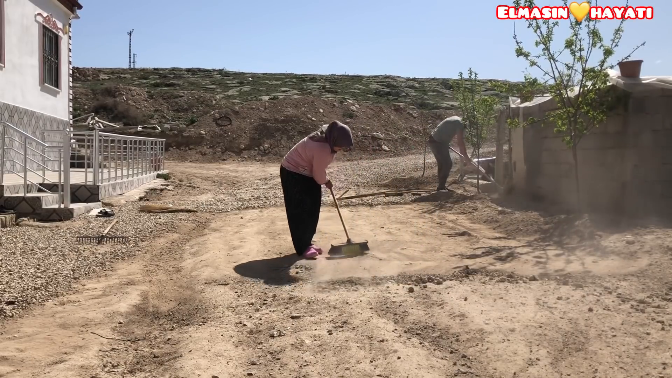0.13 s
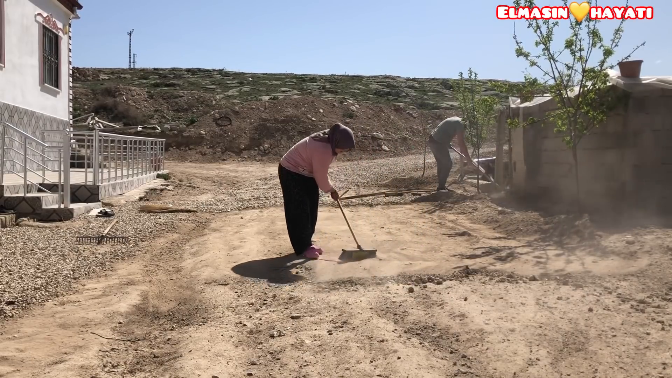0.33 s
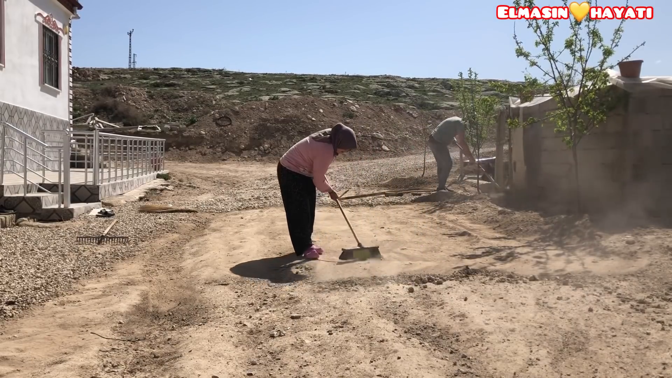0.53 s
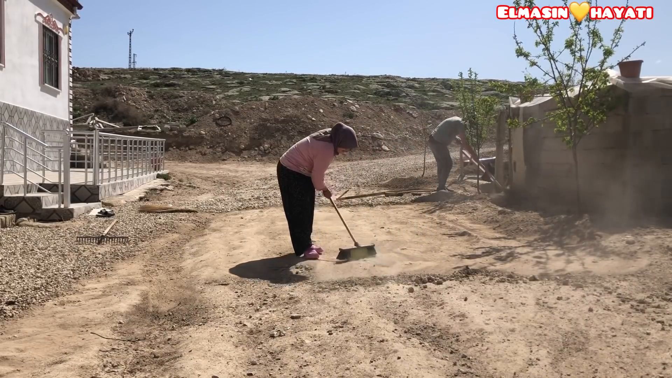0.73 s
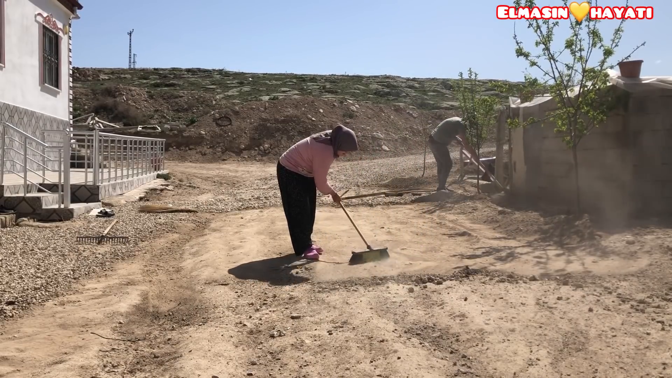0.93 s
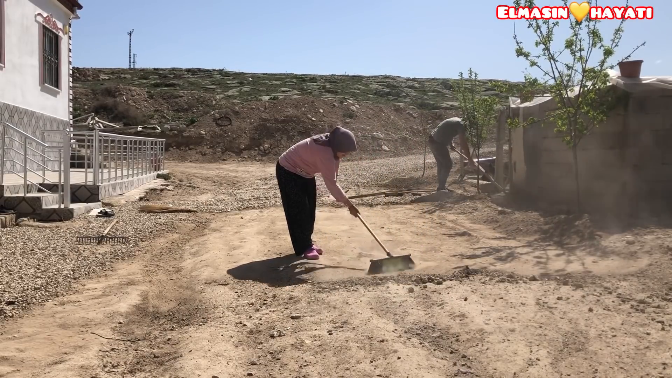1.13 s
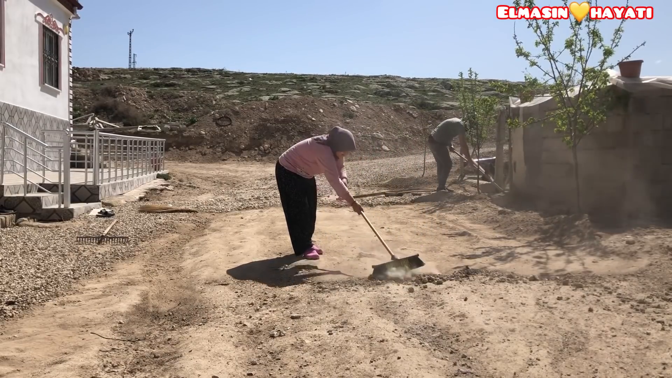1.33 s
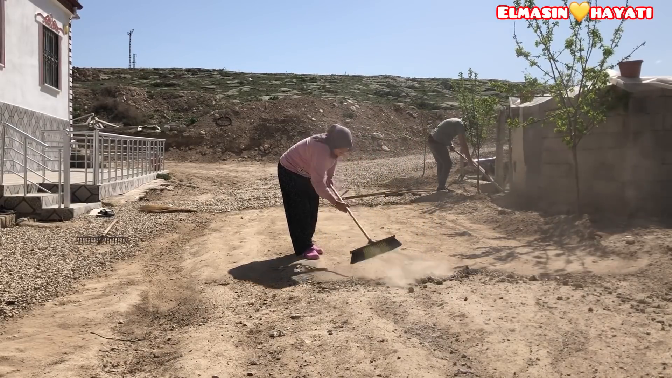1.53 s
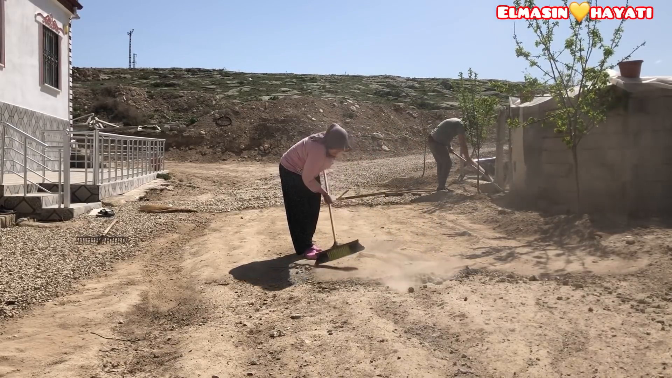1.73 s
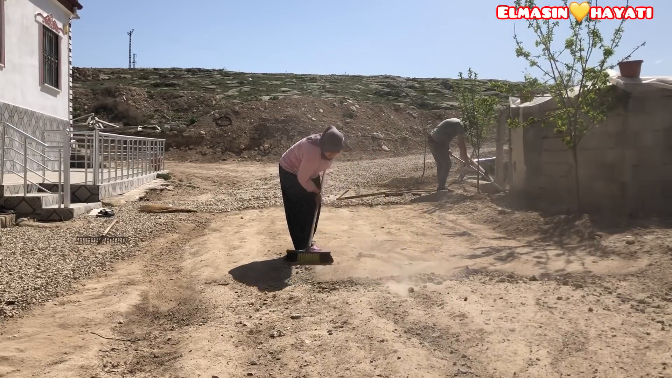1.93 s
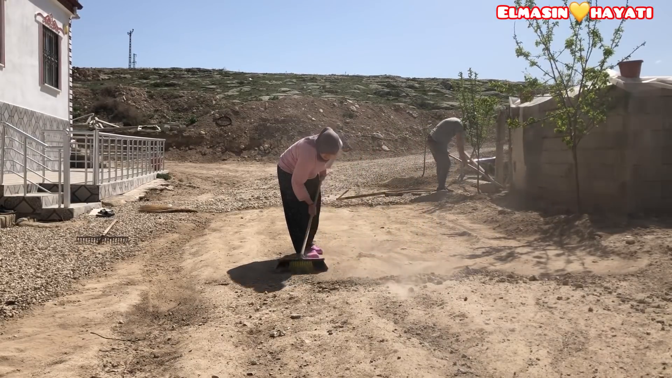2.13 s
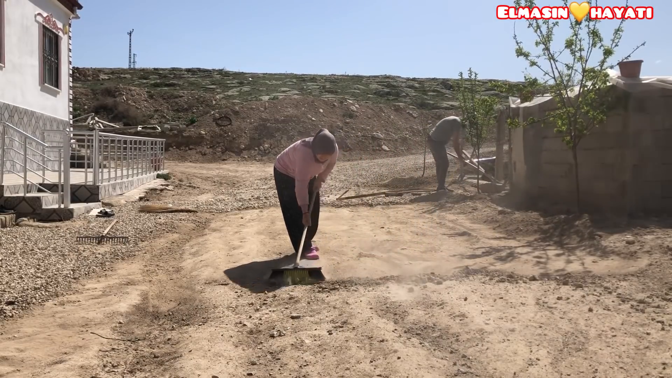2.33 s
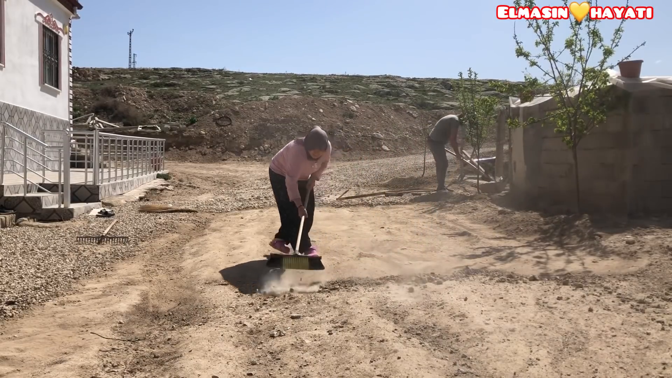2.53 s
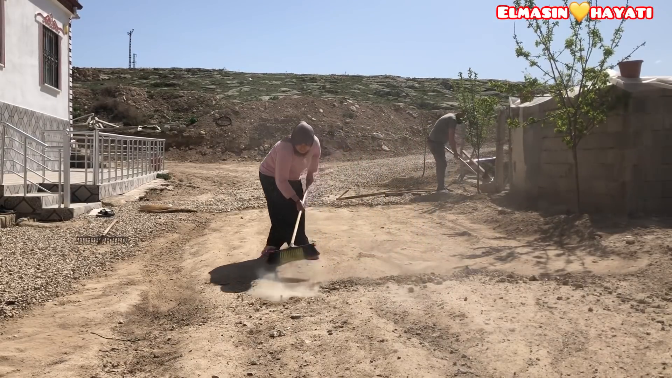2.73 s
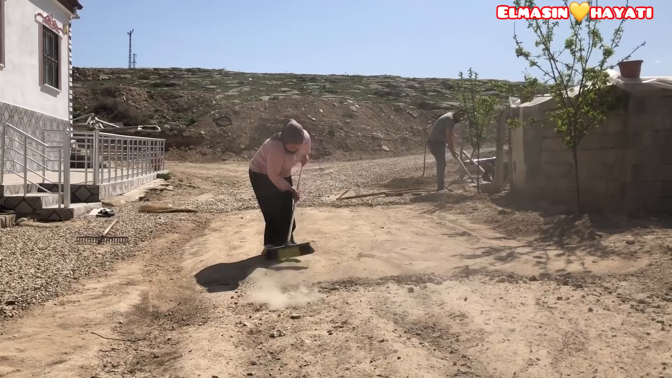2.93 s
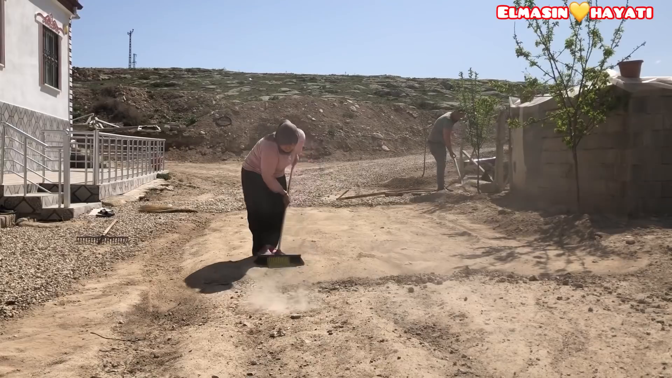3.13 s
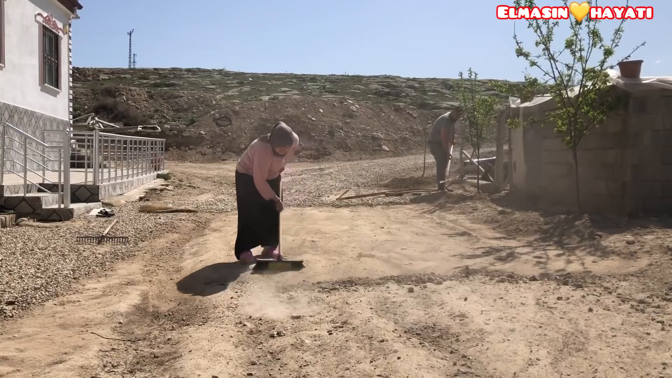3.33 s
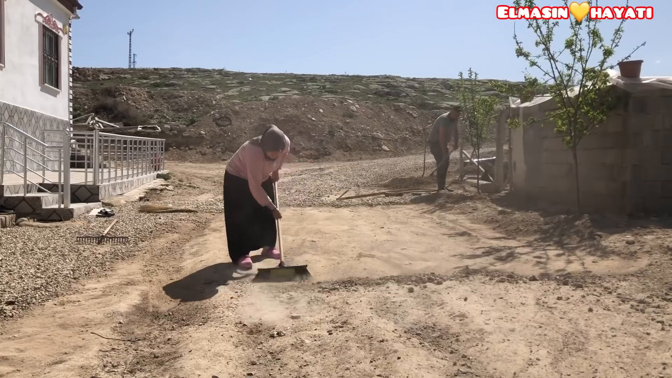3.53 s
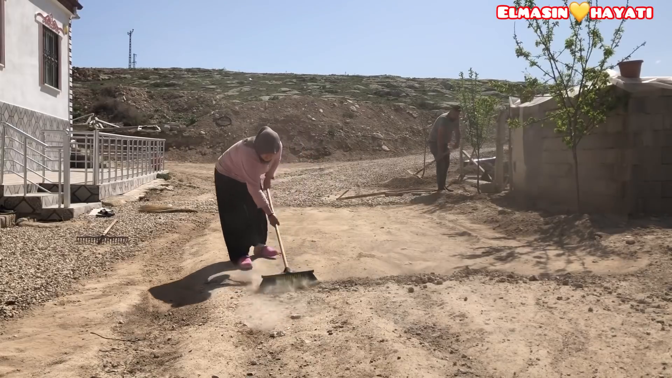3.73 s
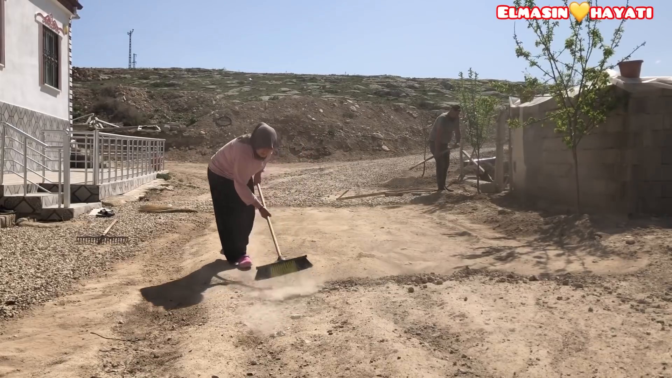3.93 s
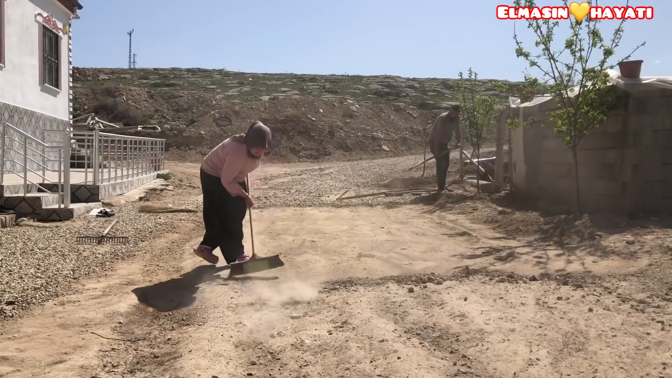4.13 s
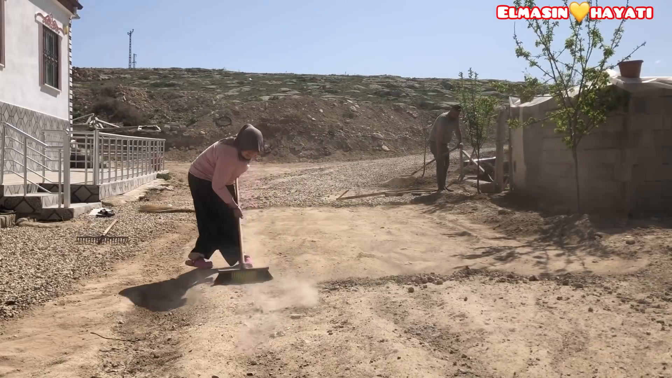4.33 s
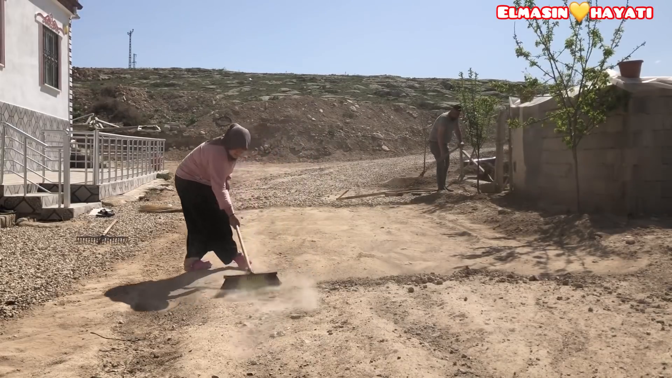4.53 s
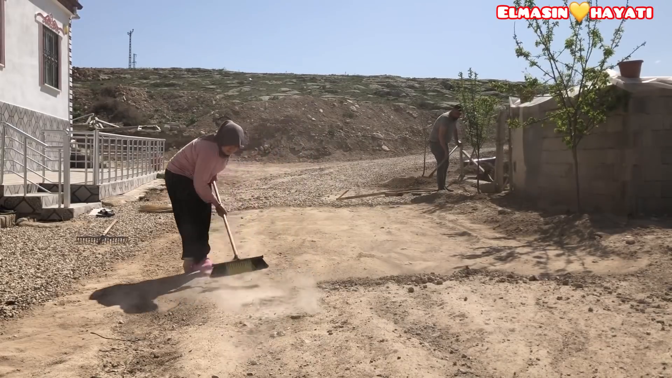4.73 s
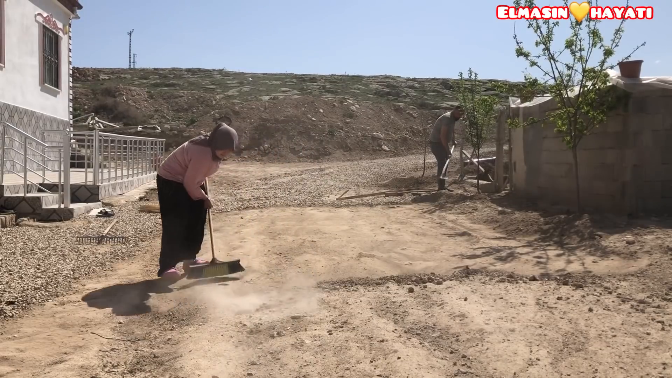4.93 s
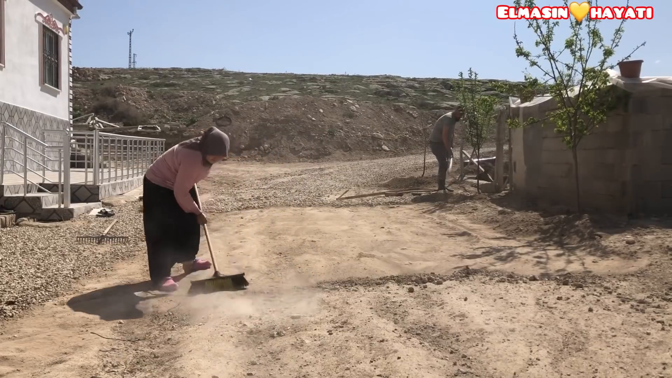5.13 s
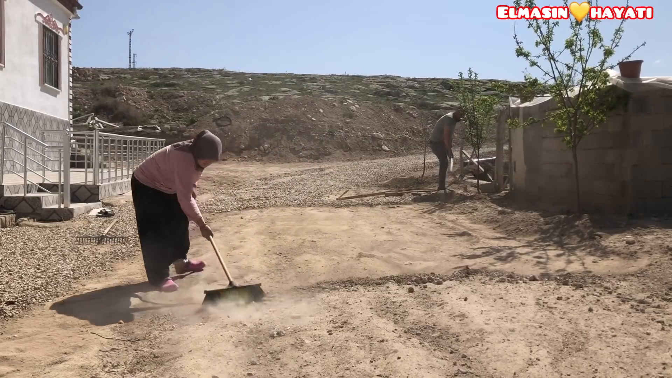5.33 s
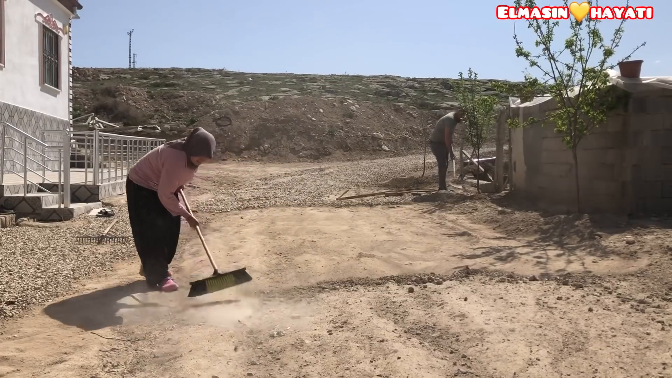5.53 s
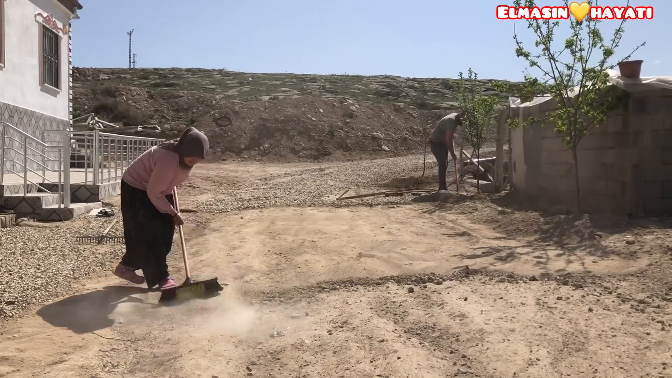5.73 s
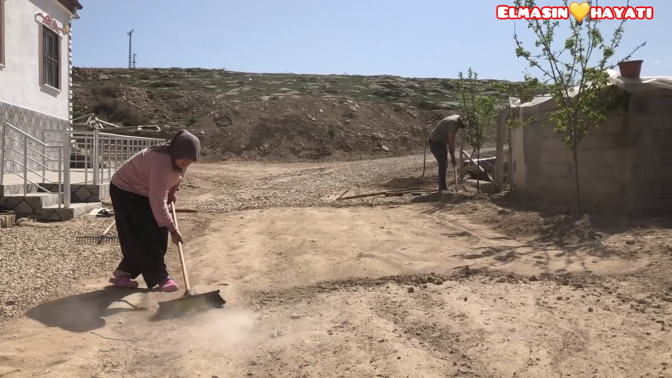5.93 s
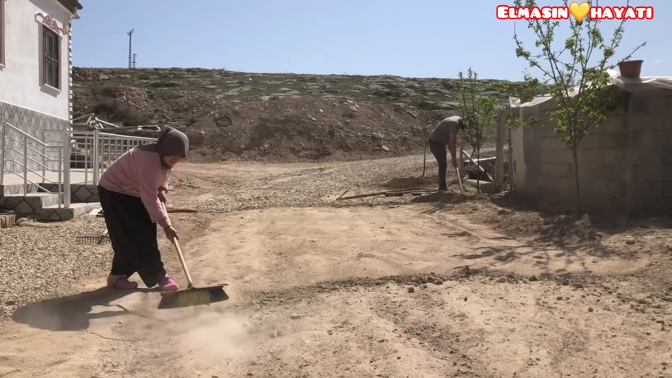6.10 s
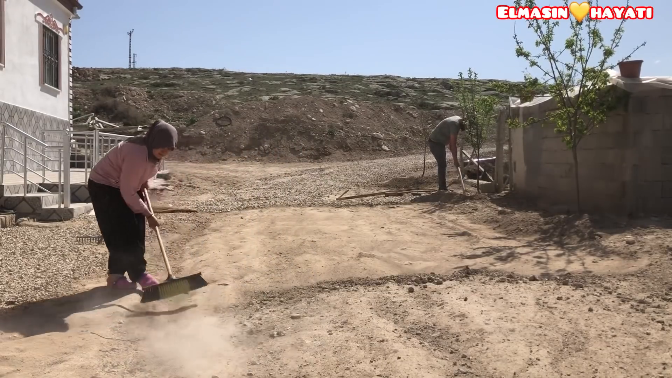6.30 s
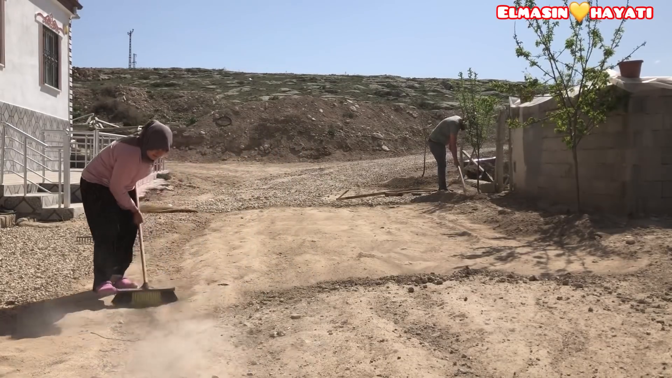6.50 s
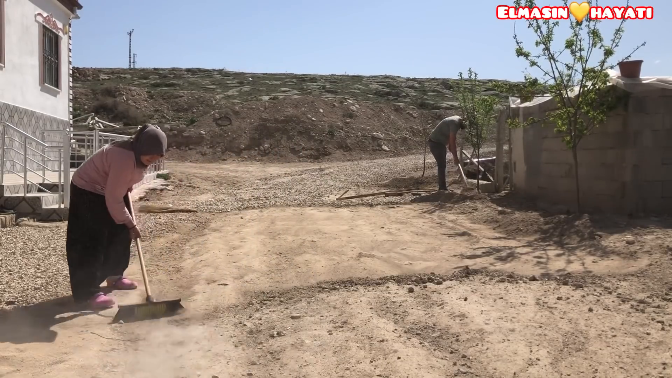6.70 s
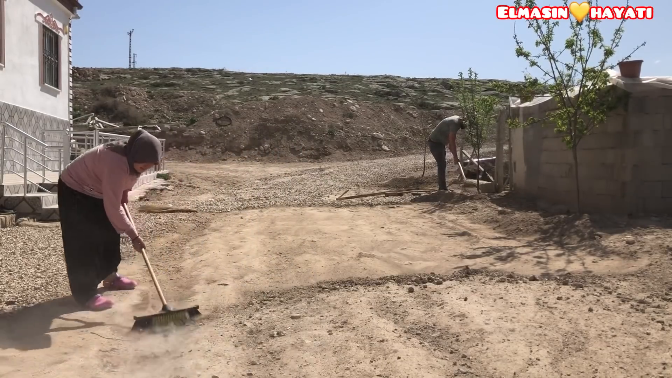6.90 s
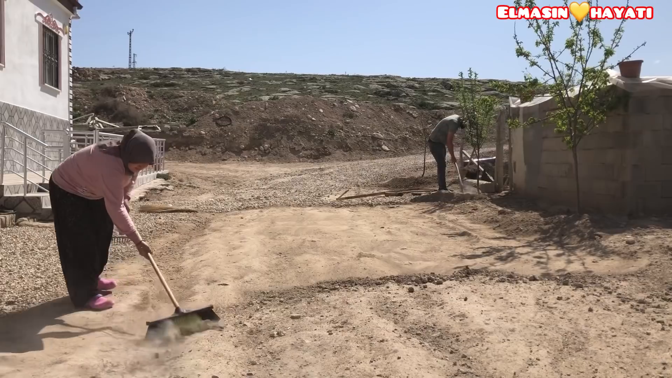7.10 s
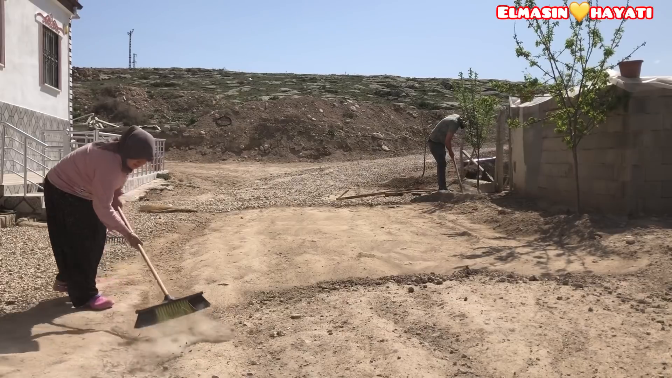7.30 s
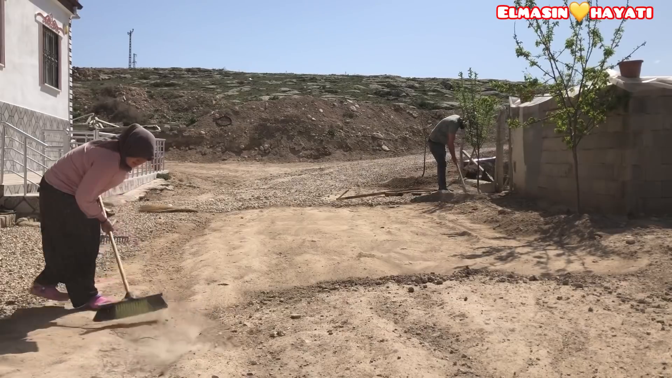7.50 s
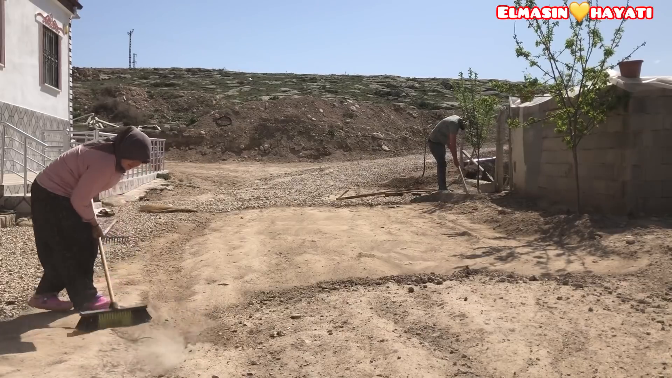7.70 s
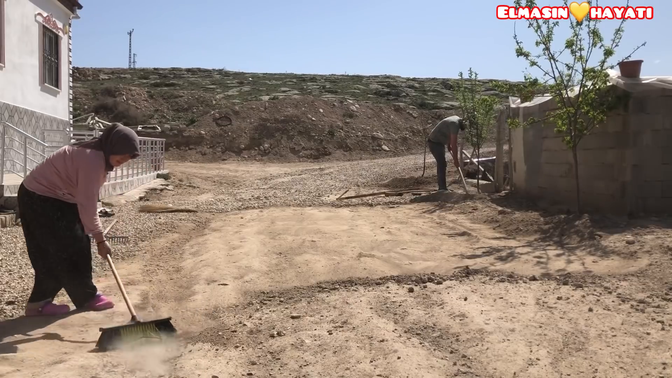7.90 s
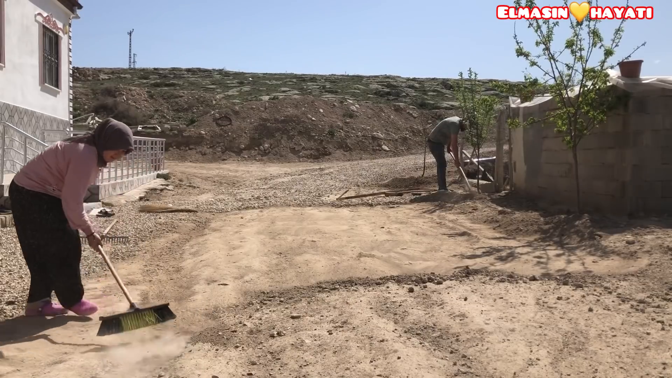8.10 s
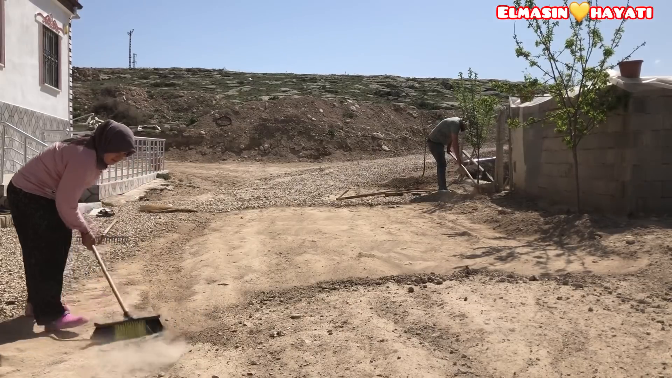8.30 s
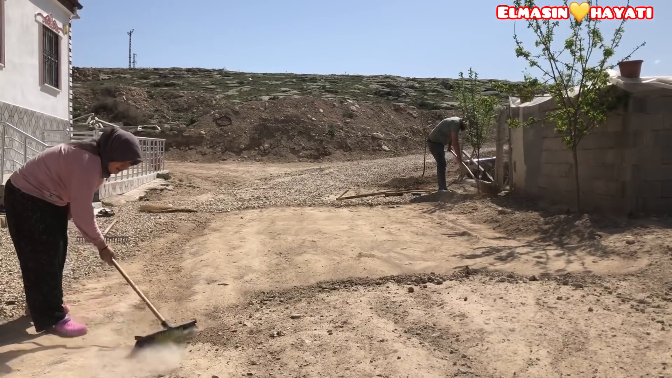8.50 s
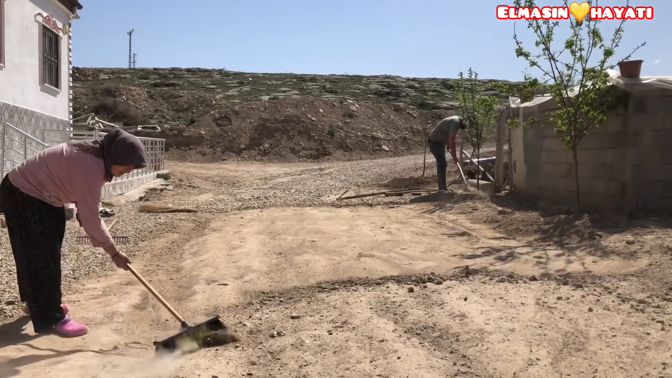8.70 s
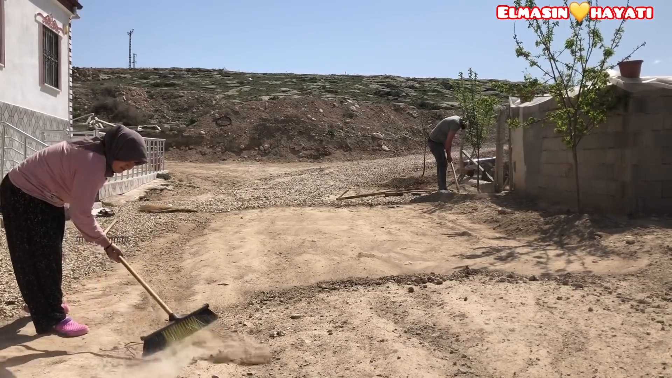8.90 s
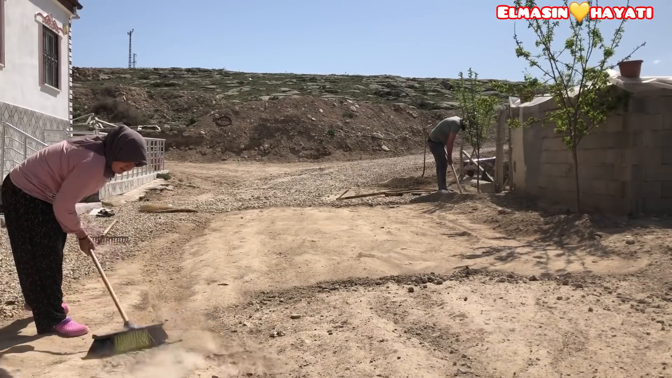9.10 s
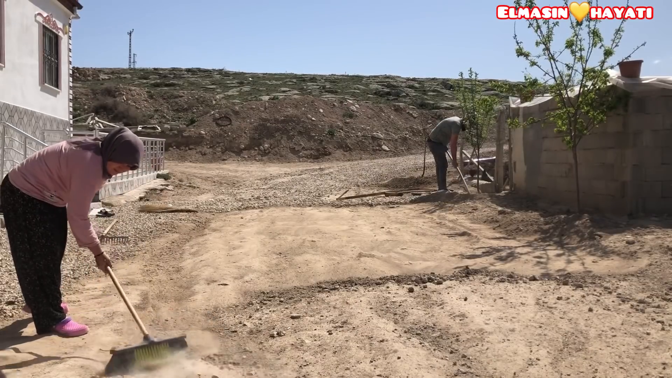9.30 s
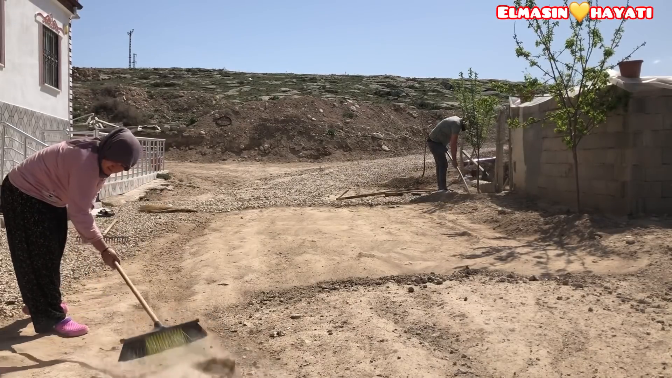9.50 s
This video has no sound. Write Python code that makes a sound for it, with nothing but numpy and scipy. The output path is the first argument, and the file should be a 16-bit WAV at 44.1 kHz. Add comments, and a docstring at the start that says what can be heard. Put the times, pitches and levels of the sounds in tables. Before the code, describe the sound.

A stiff push broom sweeps a dry dirt yard in scratchy, swishing strokes while sparrows chirp and a shovel scrapes stony soil further off.

```python
"""Sparrows call over a light breeze, then a stiff push broom lands and sweeps a dry dirt yard in mono.
Bristle hiss and coarse rasp, made of dense random grains, swell with each stroke; flung grit patters after.
From about 1.3 s a shovel further off bites soil, as noise driving its blade modes; filtered pebble snaps
follow from 2.1 s, and near 4.2 s metal chatters and rings. Near 9.2 s the broom head knocks the ground.
Birds whistle gliding notes throughout, far ones twitter, and low puffs of wind hit the microphone."""
import sys
import numpy as np
from scipy import signal
from scipy.fft import rfft, irfft, next_fast_len
from scipy.io import wavfile
from scipy.ndimage import uniform_filter1d

SR = 44100
rng = np.random.default_rng(int(sys.argv[2]) if len(sys.argv) > 2 else 0)


def store_pcm(level_fs):
    """Save levels as 16-bit WAV."""
    pcm = np.round(np.clip(level_fs, -1, 1) * 32767).astype(np.int16)
    wavfile.write(sys.argv[1], SR, np.atleast_2d(pcm).T)


N = 421155
TIME = np.arange(N) / SR

# arches of broom speed; overlapping arches shape one longer stroke:
# start t/s, length t/s, fastest point as a share of the length, hiss level/dB and rasp level/dB
# (both before the broom's make-up gain), flung grit re hiss level/dB
SPEED_ARCHES = [(0.207, 0.31, 0.29, -47, -54.5, -3), (0.493, 0.119, 0.64, -55, -57, -2),
                (0.826, 0.52, 0.63, -40, -51.5, -8.5), (1.934, 0.42, 0.44, -40.5, -53, 0.5),
                (2.056, 0.39, 0.63, -40.5, -56.5, -7.5), (3.105, 0.28, 0.53, -40, -55, -5),
                (3.233, 0.66, 0.55, -38, -51.5, -11), (4.264, 0.34, 0.44, -35.5, -48.5, -14.5),
                (4.985, 0.39, 0.53, -34.5, -50, -20), (5.159, 0.26, 0.67, -40, -52.5, -11.5),
                (5.757, 0.35, 0.41, -37.5, -48.5, -3.5), (6.521, 0.52, 0.34, -36.0, -49.5, -8.5),
                (6.707, 0.38, 0.7, -44, -52, -10), (6.882, 0.35, 0.52, -46, -53.5, -3),
                (7.443, 0.26, 0.44, -56.5, -54.5, -19.5), (7.67, 0.33, 0.45, -35.5, -48.0, -16.0),
                (8.302, 0.298, 0.43, -39.0, -49.5, -20), (8.347, 0.53, 0.55, -45, -50, 2.5),
                (9.148, 0.37, 0.35, -37.5, -47, -12.0)]
# colour of bristle tips on fine dust: f/Hz, relative level/dB
HISS_SPECTRUM = [(1500, -33), (2300, -6.5), (2900, -1.5), (3700, -3), (5000, 0.1), (6500, -0.2),
                 (8400, 1.5), (9800, 0.4), (10800, -1), (13500, -0.5), (15400, 2), (17000, -10)]
# colour of bristles dragging coarse dirt: f/Hz, relative level/dB
RASP_SPECTRUM = [(100, -12), (280, -8.5), (550, -2.5), (1000, 0), (1500, -0.8), (1850, 0), (2200, -6),
                 (3000, -4.5), (5000, -6), (12000, -25)]
# colour of falling and rolling grit: f/Hz, relative level/dB
PATTER_SPECTRUM = [(200, -6), (900, 3), (4000, -2.5), (8000, -6.5), (15000, -5)]
# fine flung grit: impacts per second, size spread level/dB, settling t/s, level/dB re flung grit
SAND = (2498, 4, 0.2, -1)
# sparse larger bits: impacts per second, size spread level/dB, settling t/s, level/dB re hiss
CRUMBS = (55.5, 6, 1, -19.5)
# bristles landing: t/s, peak level/dB, t60 t/s
LANDINGS = [(0.219, -49.5, 0.14), (0.523, -49, 0.14), (0.798, -47, 0.26), (1.962, -44, 0.053),
            (3.115, -46.5, 0.15), (4.268, -41, 0.06), (5.02, -43, 0.08), (5.759, -41.5, 0.074),
            (6.522, -55, 0.11), (6.553, -40.5, 0.11), (7.644, -39.5, 0.072), (8.248, -42.5, 0.1),
            (8.296, -38, 0.066), (9.15, -40, 0.57)]
# colour of the landing bristles: f/Hz, relative level/dB
LANDING_SPECTRUM = [(100, -17), (600, 7), (1500, 3.5), (2500, -3.5), (8000, -2.0), (15000, -4)]
# broom head knocking on the ground: t/s, peak level/dB, t60 t/s
KNOCKS = [(9.16, -48, 0.028), (9.1628, -26, 0.02)]
# colour of the head's knock: f/Hz, relative level/dB
HEAD_SPECTRUM = [(100, -21), (330, -7), (520, 1), (1100, 7), (1700, -1.5), (2900, 2), (3400, -5),
                 (4200, -8), (8000, -10.5), (15000, -10)]
# pebble clicks and cracks: t/s, peak level/dB, pitch f/Hz
PEBBLES = [(2.149, -30, 3500), (2.424, -40, 2200), (2.508, -45, 3000), (2.439, -40, 1400),
           (2.4592, -37, 1690), (2.47, -37, 1270), (2.534, -41.5, 2500), (2.641, -41, 1480),
           (2.6455, -27.5, 2600), (2.67, -43, 2500), (2.697, -44, 2020), (2.762, -45, 2020),
           (4.09, -45, 1500), (4.561, -39.5, 4850), (4.748, -45, 2520), (4.758, -41, 4200),
           (4.803, -47.5, 4500), (4.904, -49, 7050), (5.407, -44, 7000), (5.419, -45, 4500),
           (5.634, -48, 7170), (5.689, -42, 1430), (5.734, -45, 6500), (6.079, -37.5, 2500),
           (6.094, -38, 1200), (6.315, -45, 1740), (6.457, -45, 1100), (6.525, -44, 1080),
           (7.266, -47, 3520), (7.354, -40.5, 575), (8.082, -47.5, 7150), (8.794, -29, 5370)]
# shovel bites and dumps: t/s, peak level/dB, dullness as cut-off f/Hz, scrape t60 t/s
SHOVEL_STROKES = [(1.319, -52.5, 450, 1), (1.523, -44, 980, 0.061), (1.561, -52.5, 1200, 0.09),
                  (1.606, -50, 1827, 0.054), (5.948, -43, 400, 0.34), (6.025, -36.5, 750, 0.16),
                  (6.112, -35, 806, 0.19), (6.214, -48.5, 600, 0.18), (7.449, -38.5, 2400, 0.13),
                  (7.52, -50, 2960, 0.77), (7.578, -40.5, 2000, 0.17), (7.613, -44.5, 2000, 0.062),
                  (7.65, -46.5, 1600, 0.26), (8.022, -52, 900, 0.17), (9.054, -44, 2570, 0.41),
                  (9.148, -39.5, 1500, 0.14), (9.255, -37, 600, 0.055), (9.282, -39, 700, 0.085)]
# ringing modes of the shovel blade: f/Hz, relative level/dB, t60 t/s
BLADE_MODES = [(150, -2, 0.025), (504, -13, 0.11), (562, -6, 0.095), (610, -0.5, 0.082), (708, 6.5, 0.018),
               (1116, -1, 0.028), (1490, -14.5, 0.16), (1870, -6, 0.086), (2026, 1.5, 0.037),
               (2420, -11, 0.15), (2760, -5, 0.09)]
# blows on a small metal part: t/s, peak level/dB, rattle t60 t/s, relative low knock level/dB
CLANKS = [(4.143, -39.5, .04, 8.5), (4.15, -39, 0.054, 6), (4.168, -44.5, 0.15, 3),
          (4.195, -29, 0.023, -2.5), (4.205, -39.5, 0.08, -4), (4.229, -43, 0.089, 3)]
# colour of the metal chatter above its low knock: f/Hz, relative level/dB
CHATTER_SPECTRUM = [(900, -5), (1700, -15), (2800, -2.5), (5200, 5.5), (7000, -8), (9500, -0.5),
                    (12000, -11), (16000, -13)]
# ringing modes of the metal part: f/Hz, relative level/dB, t60 t/s
METAL_MODES = [(2640, -9.5, 0.24), (2890, 4, 0.028), (4120, -7, .03), (4404, -19, 0.049), (4930, -4, .04),
               (5540, -11, 0.063), (5950, -14, .2), (6120, 0, .04), (8160, 8.5, 0.04), (9250, -3, 0.11),
               (10150, -3, .06), (13810, 0, .08)]
# two syllables of each sparrow call: t/s from the call's start, pitch f/Hz
CHIRRUP = [
    [(0, 4260), (.015, 5000), (.026, 4970), (.034, 5700), (.039, 4460), (.058, 4040)],
    [(.088, 4100), (.103, 4580), (.114, 4700), (.12, 5500), (.126, 4200)],
]
CHURR = [
    [(0, 4390), (.018, 4380), (.042, 4060)],
    [(.042, 2870), (.06, 3280), (.077, 3010), (.094, 2510)],
]
# sparrow calls by name, each a list of syllables: pitch contour, trill depth as a share of the pitch,
# relative level/dB
SONGS = {"chirrup": [(CHIRRUP[0], .012, 0), (CHIRRUP[1], .012, 0)], "churr": [(CHURR[0], 0.062, 1),
         (CHURR[1], 0.038, -2.1)]}
# sparrow calls: t/s, call name, level/dB before the birds' loudness wander
CHIRPS = [(-.014, "chirrup", -53), (0.844, "churr", -53), (1.781, "chirrup", -55), (2.9, "churr", -53),
          (3.774, "chirrup", -51), (4.593, "churr", -53), (5.493, "chirrup", -57.5), (6.31, "churr", -53),
          (7.074, "chirrup", -54), (8.996, "churr", -54)]
# single notes of other birds: t/s, length t/s, level/dB before the wander, start, middle and end pitch f/Hz
WHISTLES = [(0.699, 0.053, -67, 2670, 2880, 2780), (1.19, 0.053, -51, 1640, 1730, 1710),
            (3.04, .07, -71, 3070, 4230, 5000), (3.82, 0.055, -53, 1700, 1690, 1700),
            (3.975, .038, -61, 4100, 4700, 4540), (4.04, 0.067, -60, 2975, 4200, 2800),
            (5.89, 0.11, -51, 3440, 2560, 2530), (6.227, 0.11, -56, 3500, 2490, 2540),
            (6.312, 0.015, -45.5, 1580, 1810, 1950), (7.304, 0.047, -58.5, 4400, 5250, 5000)]
# colour of the open-air hush: f/Hz, relative level/dB
AIR_SPECTRUM = [(15, -38), (25, -11), (75, 0.5), (160, -2.5), (289, -7), (368, -8), (421, -7), (582, -8.5),
                (1380, -16), (1490, -18), (2120, -22), (2770, -21), (3000, -18), (15500, -30)]
# wind puffs on the microphone: centre t/s, level/dB, Gaussian width t/s
PUFFS = [(0.868, -58, 0.04), (1.29, -62, .07), (2.68, -56, .05), (4.805, -51, 0.036), (6.82, -53, 0.027),
         (8.33, -54, 0.027)]
# colour of the puffs: f/Hz, relative level/dB
PUFF_SPECTRUM = [(15, -30), (42, 11), (70, 2), (160, -38), (1000, -72)]

HISS_POWER, RASP_POWER, FLING_POWER = 1.8, 1.46, 2.26  # each grows as this power of the broom's speed
SWELLS_PER_S, SWELL_DB = 22, 0.46  # each push swells and sags slightly at random
SWING_IN_S = 0.04  # an arch may start this long before the bristles touch down
TRILL_HZ = 228
TWITTER_PER_S, TWITTER_S, TWITTER_DB = 6, 0.05, -67  # notes a second, note length, loudest note
TWITTER_LOW_HZ, TWITTER_HIGH_HZ = 2990, 5260  # pitch at the top of each arch
TOP_HZ = 15800


def undb(db):
    """Decibels to gain."""
    return 10 ** (np.asarray(db) / 20)


def unit(x):
    """Scale to a standard deviation of 1."""
    return x / np.std(x)


def add(track, s, sound):
    """Mix a sound into the track at s seconds."""
    i = int(s * SR)
    sound = sound[max(-i, 0):N - i]
    start = max(i, 0)
    track[start:start + len(sound)] += sound


def butter(x, hz, kind, order=2):
    """Causal low- or high-pass."""
    sos = signal.butter(order, min(hz, SR / 2 - 500), kind, fs=SR, output="sos")
    return signal.sosfilt(sos, x)


def colour(x, points):
    """Filter x through a curve of (Hz, dB) points, then level it to 1."""
    hz, db = np.transpose(points)
    size = next_fast_len(len(x))
    f = np.maximum(np.fft.rfftfreq(size, 1 / SR), 1)
    gain = undb(np.interp(np.log(f), np.log(hz), db))
    return unit(irfft(rfft(x, size) * gain, size)[:len(x)])


def walk(rate):
    """Smooth random wander with rate new values a second, spread 1."""
    k = max(int(SR / rate), 1)
    steps = np.repeat(rng.standard_normal(N // k + 1), k)
    return unit(uniform_filter1d(steps, k)[:N])


def grains(rate, spread_db):
    """Random tiny impacts, rate a second, a few much larger than the rest."""
    size = undb(spread_db * np.minimum(rng.exponential(size=N), 4))
    hits = rng.random(N) < rate / SR
    return unit(hits * rng.choice([-1, 1], N) * size)


def burst(t60, rise):
    """A crowd of contacts that builds quickly and dies away, at most half a second long."""
    t = TIME[:SR // 2]
    return rng.standard_normal(len(t)) * (1 - np.exp(-t / rise)) * undb(-60 * t / t60)


def ring(push, modes, direct):
    """Drive a body's decaying modes; part of the contact noise radiates directly."""
    t = TIME[:SR // 2]
    body = sum(np.sin(2 * np.pi * hz * t) * undb(db - 60 * t / t60) for hz, db, t60 in modes)
    ringing = signal.fftconvolve(push, body / np.linalg.norm(body))[:len(push)]
    return ringing + direct * push


def peak(x, db):
    """Set the level of the loudest two milliseconds."""
    return x * undb(db) / np.sqrt(uniform_filter1d(x * x, size=88).max())


def broom(hiss, rasp):
    """Thousands of bristle tips flick over fine dust and drag coarser dirt; tufts catch and slip together."""
    catch_db = 0.46 * walk(70) + 0.3 * walk(400)
    tips = shimmer(colour(grains(24000, spread_db=0.5), HISS_SPECTRUM), depth_db=1.5)
    # the sweeper comes closer and the highest hiss opens up
    high_pass = signal.butter(2, 11500, "high", fs=SR, output="sos")
    top = signal.sosfiltfilt(high_pass, tips)
    opening_db = np.interp(TIME, [0, TIME[-1]], [-2.2, 1.8])
    tips = tips + top * (undb(opening_db) - 1)
    dirt = shimmer(colour(grains(7000, spread_db=2.0), RASP_SPECTRUM), depth_db=1.5)
    dust_sound = tips * hiss * undb(2.0 + catch_db)
    dirt_sound = dirt * rasp * undb(5 + catch_db + 0.72 * walk(45))
    return dust_sound + dirt_sound


def stroke_strengths():
    """Arches of broom speed, summed in power into strokes, drive the hiss, rasp and flung grit."""
    power = np.zeros((3, N))
    for s, length, fastest, hiss_db, rasp_db, grit_db in SPEED_ARCHES:
        swing = np.interp((TIME - s) / length, [0, np.clip(fastest, .1, .9), 1], [0, .5, 1])
        # silent until the bristles land, if a landing follows closely
        touch = next((row[0] for row in LANDINGS if s < row[0] < s + SWING_IN_S), s)
        speed = np.sin(np.pi * swing) * (TIME >= touch)
        power[0] += (undb(hiss_db) * speed ** HISS_POWER) ** 2
        power[1] += (undb(rasp_db) * speed ** RASP_POWER) ** 2
        power[2] += (undb(hiss_db + grit_db) * speed ** FLING_POWER) ** 2
    return np.sqrt(power) * undb(SWELL_DB * walk(SWELLS_PER_S))


def shimmer(x, depth_db):
    """Narrow bands of the sound swell and fade slightly at random."""
    spectrum = signal.stft(x, nperseg=1024)[2]
    patches = rng.standard_normal(spectrum.shape)
    for axis in (0, 1):  # smooth across frequency, then time
        patches = uniform_filter1d(patches, size=7, axis=axis)
    return unit(signal.istft(spectrum * undb(depth_db * unit(patches)))[1][:N])


def grit(thrown, rate, spread_db, settle_s, db):
    """Grit thrown by a stroke keeps pattering down and rolling after it."""
    keep = np.exp(-1 / (settle_s * SR))
    airborne = signal.lfilter([1 - keep], [1, -keep], thrown)
    return colour(grains(rate, spread_db), PATTER_SPECTRUM) * airborne * undb(db)


def landings():
    """The bristle tips hit the ground almost together; pressed hard, the head knocks too."""
    out = np.zeros(N)
    for s, db, t60 in LANDINGS:
        brush = colour(burst(t60, rise=0.0034), LANDING_SPECTRUM)
        add(out, s, peak(brush, db))
    for s, db, t60 in KNOCKS:
        knock = colour(burst(t60, rise=0.0008), HEAD_SPECTRUM)
        add(out, s, peak(knock, db))
    return out


def pebbles():
    """A stone gives one sharp snap and a short crumble; big stones sound lower."""
    out = np.zeros(N)
    for s, db, hz in PEBBLES:
        # the harder the snap, the less crumble beside it
        contact = undb(-25 - 0.38 * (db + 43)) * burst(t60=0.026, rise=0.0003)
        contact[0] += 1
        dulled = butter(contact, hz * 1.68, "low", order=3)
        snap = butter(dulled, hz * 0.19, "high", order=1)
        add(out, s, peak(snap, db))
    return out


def shovel():
    """Stony soil grinds along the blade; soft loads only wake its low modes."""
    out = np.zeros(N)
    for s, db, hz, t60 in SHOVEL_STROKES:
        dulled = butter(burst(t60, rise=0.0016), hz, "low")
        soil = butter(dulled, hz / 4, "high", order=1)
        add(out, s, peak(ring(soil, BLADE_MODES, direct=1.2), db))
    return out


def clanks():
    """Loose metal chatters and rings briefly, with a dull knock under it."""
    out = np.zeros(N)
    for s, db, t60, knock_db in CLANKS:
        low_knock = [(80, knock_db), (260, knock_db + 3.5)]
        chatter = colour(burst(t60, rise=0.00035), low_knock + CHATTER_SPECTRUM)
        add(out, s, peak(ring(chatter, METAL_MODES, direct=1), db))
    return out


def birds():
    """Glided, trilled whistles of unsteady loudness, scattered by the walls and the bank."""
    out = np.zeros(N)
    for s, call, db in CHIRPS:
        for contour, trill, syllable_db in SONGS[call]:
            add(out, s + contour[0][0], undb(db + syllable_db) * whistle(contour, trill))
    for s, length, db, first_hz, middle_hz, last_hz in WHISTLES:
        t = TIME[:int(length * SR)]
        curve = np.polyfit([0, length / 2, length], [first_hz, middle_hz, last_hz], 2)
        arc = np.polyval(curve, t)
        add(out, s, undb(db) * whistle(np.column_stack([t, arc]), trill=.006))
    out = out * undb(0.5 + 3.8 * walk(160))
    return out + undb(-15) * yard(out, t60=0.23)


def whistle(contour, trill):
    """One glided note along (s, Hz) points, with a fast trill on its pitch."""
    knots, pitch = np.transpose(contour)
    t = np.arange(knots[0], knots[-1], 1 / SR)
    wobble = np.sin(2 * np.pi * (TRILL_HZ * t + rng.random()))
    hz = np.interp(t, knots, pitch) * (1 + trill * wobble)
    return np.sin(2 * np.pi * np.cumsum(hz) / SR) * signal.windows.tukey(len(t), .4)


def twitter():
    """Far birds: faint short arched notes at random times and pitches, blurred by the yard."""
    out = np.zeros(N)
    for when, height, glide, far in rng.random((int(TWITTER_PER_S * TIME[-1]), 4)):
        hz = TWITTER_LOW_HZ + height * (TWITTER_HIGH_HZ - TWITTER_LOW_HZ)
        first_hz = hz * (1 - .3 * glide)
        last_hz = hz * (1 - .3 * (1 - glide))
        note = whistle([(0, first_hz), (TWITTER_S / 2, hz), (TWITTER_S, last_hz)], trill=.025)
        add(out, when * TIME[-1], undb(TWITTER_DB - 6.1 * far) * note)
    return out + yard(out, t60=0.3)


def yard(x, t60):
    """Thin, dull scatter from the house front and the garden wall, as a decaying noise tail."""
    tail = butter(burst(t60, rise=0.0093), 5600, "low", order=1)
    return signal.fftconvolve(x, tail / np.linalg.norm(tail))[:N]


def breeze():
    """Open-air hush that wavers slightly, with low puffs on the microphone."""
    hush_db = -60.5 + 0.8 * walk(1) + 1.7 * walk(28)
    hush = colour(rng.standard_normal(N), AIR_SPECTRUM) * undb(hush_db)
    gust = sum(undb(db) * np.exp(-((TIME - s) / width) ** 2) for s, db, width in PUFFS)
    return hush + gust * colour(rng.standard_normal(N), PUFF_SPECTRUM)


def scene():
    """Broom, stones and tools in the yard, with birds and breeze, the same in both ears."""
    hiss, rasp, flung = stroke_strengths()
    sweeping = broom(hiss, rasp) + grit(flung, *SAND) + grit(hiss, *CRUMBS) + landings()
    work = sweeping + pebbles() + clanks() + shovel()
    mono = work + undb(-17) * yard(work, t60=0.41) + birds() + twitter() + breeze()
    return np.array([mono, mono])


def record(dry):
    """The recorder cuts the top steeply."""
    return signal.sosfilt(signal.ellip(12, .1, 75, TOP_HZ, fs=SR, output="sos"), dry)


dry = scene()
out = record(dry)
store_pcm(out)
```